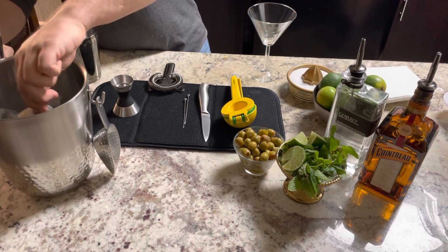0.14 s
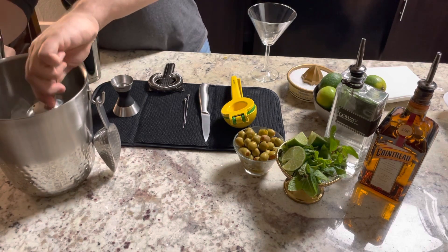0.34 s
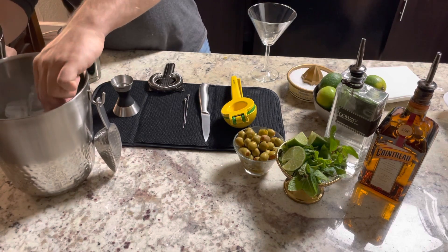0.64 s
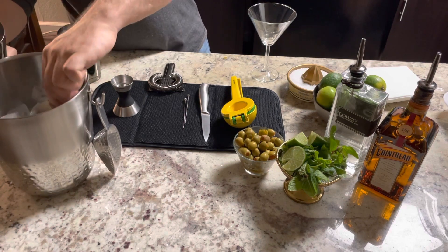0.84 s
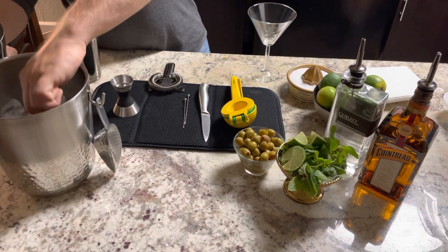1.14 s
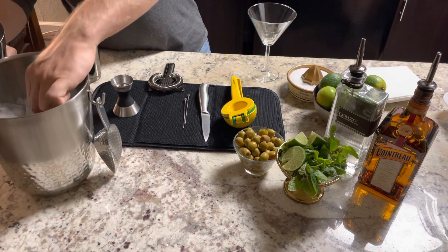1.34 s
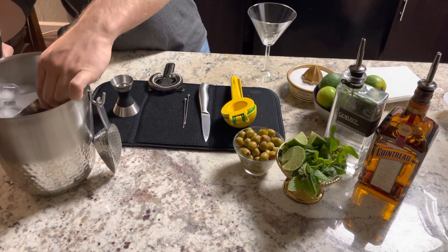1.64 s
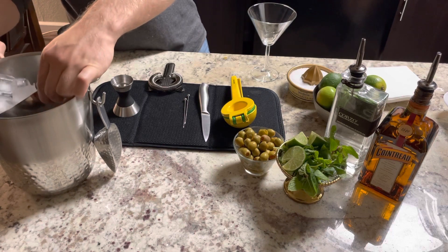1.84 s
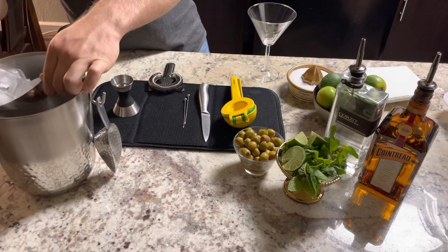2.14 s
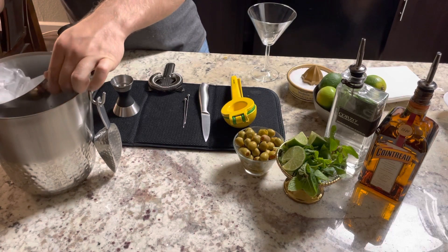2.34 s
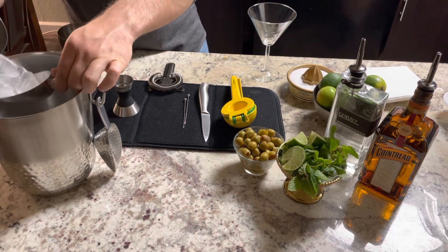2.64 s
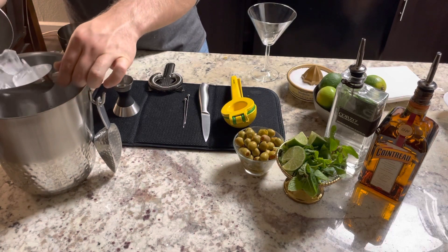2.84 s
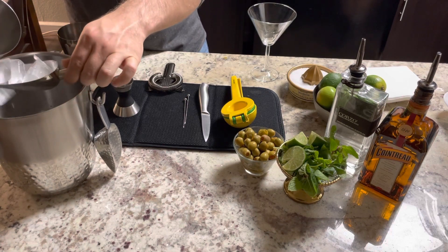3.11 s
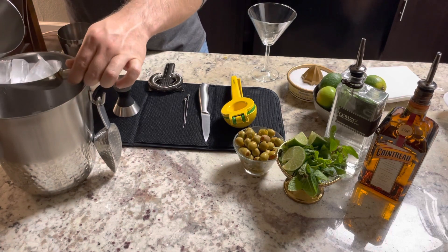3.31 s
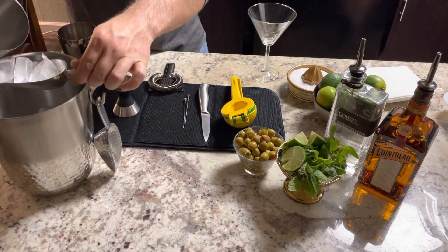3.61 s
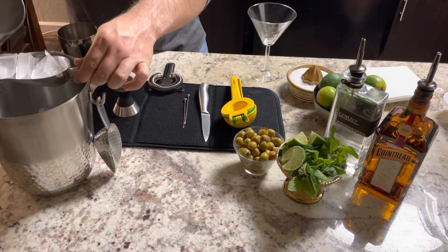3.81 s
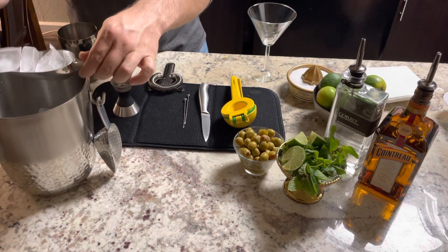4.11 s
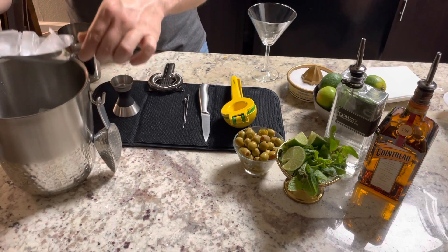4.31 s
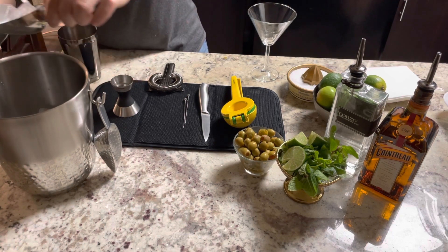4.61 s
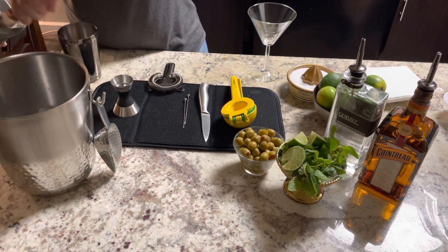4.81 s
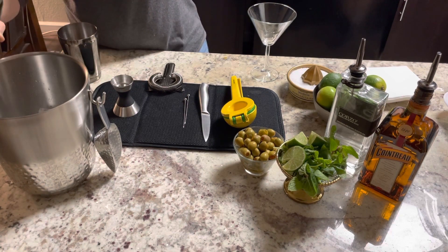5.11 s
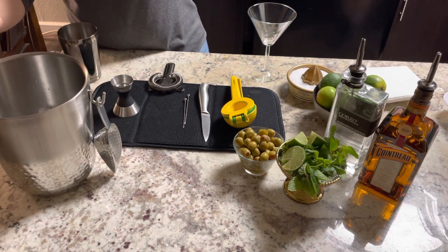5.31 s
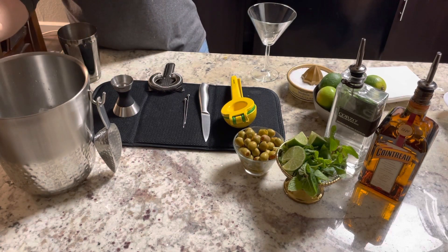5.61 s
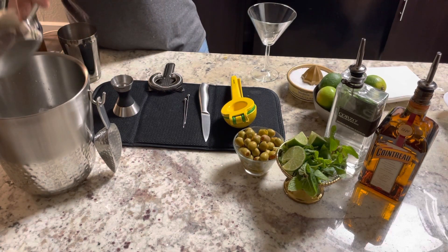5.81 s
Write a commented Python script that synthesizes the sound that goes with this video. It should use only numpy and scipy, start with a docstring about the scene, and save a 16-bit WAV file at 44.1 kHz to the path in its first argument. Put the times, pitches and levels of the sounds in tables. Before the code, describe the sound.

Ice is scooped from a steel bucket: busy glassy clatter, grinding and low metallic thuds, fading to faint ticks. Two brisk shakes of the loaded scoop follow, then near silence over soft room hum. A faint squeak precedes cubes dropping into a metal shaker with two strong, close knocks, a hollow note and thin high ringing. Small late ticks end it. Near microphone, small hard kitchen, wide stereo.

```python
"""In a kitchen, a metal scoop digs ice cubes out of a steel bucket, is shaken level, and tips a few into a steel shaker.
Each collision is a pitched knock, a clack, a brittle crack and a thud of the air in the vessel.
Between collisions the cubes grind, made of dense clicks; a faint squeak is heard as the scoop is lifted.
The steel walls and the scoop ring as fading tones, the kitchen answers with sparse echoes over a low hum,
and the recorder's stereo processing spreads it all over a left and a right channel."""
import sys
import numpy as np
from scipy import signal
from scipy.fft import rfft, irfft
from scipy.io import wavfile
from scipy.ndimage import uniform_filter1d

SR = 44100
rng = np.random.default_rng(int(sys.argv[2]) if len(sys.argv) > 2 else 0)


def store_wav(level_fs):
    """Save 16-bit WAV to argv[1]."""
    pcm = np.round(np.clip(np.atleast_2d(level_fs), -1, 1) * 32767)
    wavfile.write(sys.argv[1], SR, pcm.T.astype(np.int16))


N = 262395  # length in samples

# Two-row sounds hold a common part (shared by left and right) and a spread part (opposite in left and right).


def amp(db):
    """Turns decibels into a gain."""
    return 10 ** (np.asarray(db) / 20)


def evened(x):
    """Scales a sound to an rms of 1."""
    return x / np.sqrt(np.mean(x ** 2) + 1e-20)


def read(points, hz):
    """Reads a table's value at hz, on a log-frequency axis."""
    f, value = np.transpose(points)
    return np.interp(np.log(hz + 1), np.log(f + 1), value)


def add(mix, s, sound):
    """Adds a sound into the mix at time s."""
    start = max(round(s * SR), 0)
    part = mix[..., start:][..., :sound.shape[-1]]
    part += sound[..., :part.shape[-1]]


def tone(hz, t):
    """A plain sine wave."""
    return np.sin(2 * np.pi * hz * t)


def colour(x, spectrum, size=4096):
    """Filters a sound to the given spectrum, without pre-echo and with unit filter energy."""
    log_gain = np.log(amp(read(spectrum, abs(np.fft.fftfreq(size, 1 / SR)))))
    # minimum phase: the filter's energy comes as early as it can
    response = np.exp(np.conj(signal.hilbert(log_gain)))
    taps = np.fft.ifft(response).real[:size // 2]
    taps = taps / np.linalg.norm(taps)
    return signal.oaconvolve(x, taps[None], axes=1)[:, :N]


def fade(t, t60):
    """An exponential fall of 60 dB every t60 seconds."""
    return np.exp(-np.log(1000) * t / t60)


def dying(t, t60, rise):
    """Loudness of a struck sound: a soft start, then an exponential fall."""
    return (1 - np.exp(-t / rise)) * fade(t, t60)


def with_rebounds(hits, gap_s, loss_db, spread_octaves):
    """Each struck cube bumps a neighbour a moment later: weaker, and at another pitch."""
    s, hz, knock, crack, thud = np.transpose(hits)
    delay, detune = rng.random((len(hits), 2)).T
    later_s = s + gap_s * (.5 + delay)
    other_hz = hz * 2 ** (spread_octaves * (2 * detune - 1))
    rebounds = [later_s, other_hz, knock - loss_db, crack - loss_db, thud - loss_db]
    return np.vstack([hits, np.transpose(rebounds)])


# Tone of breaking ice, for the crack and for its brighter snap. Columns: frequency_hz, relative_level_db
CRACK_SPECTRUM = [(300, -20), (1500, -1), (3000, 3.5), (4500, -0.5), (6000, 1.5), (8000, -1.5),
                  (10000, -2.5), (12000, -5.5), (14500, -6.5), (16000, -17.5)]
SNAP_SPECTRUM = [(1000, -32.5), (4000, -22.5), (5200, -9.5), (6500, -4), (8500, 6), (10500, 2),
                 (12000, -0.5), (14000, -5), (16000, -3.5)]


def collisions(hits, clack_colour, thud_colour, knock_db, clack_db, crack_db, snap_db, thud_db,
               knock_t60, clack_t60, crack_t60, snap_t60, thud_t60):
    """Each hit: a short pitched knock, and bursts of noise as the faces meet and chip."""
    t = np.arange(SR // 6) / SR
    knocks, clacks, cracks, snaps, thuds = np.zeros((5, 2, N))
    for s, hz, knock, crack, thud, *_ in hits:
        chatter = rng.standard_normal((4, 2, len(t)))
        add(knocks[0], s, amp(knock + knock_db) * dying(t, knock_t60, 0.00086) * tone(hz, t))
        add(clacks, s, amp(knock + clack_db) * dying(t, clack_t60, 0.00089) * chatter[0])
        add(cracks, s, amp(crack + crack_db) * dying(t, crack_t60, .0012) * chatter[1])
        add(thuds, s, amp(thud + thud_db) * dying(t, thud_t60, 0.0031) * chatter[2])
        # the more the crack outweighs the knock, the more ice breaks, with a brighter snap
        brittle = 1 / (1 + amp(2 * (knock - crack)))
        add(snaps, s, brittle * amp(crack + snap_db) * dying(t, snap_t60, .0007) * chatter[3])
    out = knocks + colour(clacks, clack_colour) + colour(cracks, CRACK_SPECTRUM)
    return out + colour(snaps, SNAP_SPECTRUM) + colour(thuds, thud_colour)


def chips(per_s, spread_db):
    """Dense random clicks of uneven size, as common and spread parts."""
    size = amp(spread_db * np.minimum(rng.exponential(1, N), 4))
    happens = rng.random(N) < per_s / SR
    return evened(size * happens * rng.standard_normal((2, N)))


def jostle(per_s, t60, spread_db, centre_hz, spread_octaves, count=32):
    """A dense crunch of small knocks; the cubes are of like size, so their pitches crowd round one centre."""
    t, out = np.arange(SR // 20) / SR, np.zeros((2, N))
    clicks, cube = chips(per_s, spread_db), rng.integers(0, count, N)
    octaves = spread_octaves * np.arctanh(np.linspace(-.95, .95, count))
    for k, hz in enumerate(centre_hz * 2 ** octaves):
        knock = dying(t, t60, 0.00067) * tone(hz, t)
        out += signal.oaconvolve(clicks * (cube == k), knock[None], axes=1)[:, :N]
    return evened(out)


def stroke(t, length, sag):
    """A push starts the cubes at once; the level sags steadily (or swells if negative), then they come to rest."""
    attack_s, release_t60 = 0.0014, 0.076
    held_db = -sag * np.minimum(t, length) - 60 * np.maximum(t - length, 0) / release_t60
    return np.clip(t / attack_s, 0, 1) * amp(held_db)


def grinding(strokes, clack_colour, thud_colour, small_knocks, knocks_db, clack_db, crack_db, thud_db, uneven_db):
    """Sliding cubes stick and slip: small knocks and a fine crunch follow the stroke."""
    t, power = np.arange(SR) / SR, np.zeros((3, N))
    for s, length, level, sag, crispness, weight in strokes:
        levels_db = [[level], [level + crispness], [level + weight]]
        add(power, s, (amp(levels_db) * stroke(t, length, sag)) ** 2)
    grind, crisp, push = np.sqrt(power)
    # many contacts slip at once, in clumps of a few milliseconds
    smooth_noise = uniform_filter1d(rng.standard_normal(N), size=260)
    clumps = evened(uniform_filter1d(smooth_noise, size=130))
    slips = evened(chips(per_s=2500, spread_db=-0.5) * amp(uneven_db * clumps))
    out = amp(knocks_db) * grind * small_knocks
    out += amp(clack_db) * colour(grind * slips, clack_colour)
    out += amp(crack_db) * colour(crisp * slips, CRACK_SPECTRUM)
    return out + amp(thud_db) * colour(push * slips, thud_colour)


def ring(x, modes):
    """The sound inside a vessel sets its wall resonances humming along."""
    out = np.zeros_like(x)
    for hz, width, db in modes:
        r = np.exp(-np.pi * width / SR)
        turn = np.exp(2j * np.pi * hz / SR)
        out += 2 * amp(db) * signal.lfilter([1 - r], [1, -r * turn], x).real
    return out


# The air in the bucket rings lower the deeper the scoop is in. Columns: time_s, pitch_hz
BUCKET_AIR_PITCH = [(0, 480), (.5, 450), (.8, 425), (1.2, 428), (1.55, 412), (1.85, 435), (2.9, 418),
                    (3.25, 420), (3.4, 470)]


def bucket_air(x, width_hz, db):
    """The resonance of the air in the bucket, which moves with the scoop."""
    hz = np.interp(np.arange(N) / SR, *np.transpose(BUCKET_AIR_PITCH))
    turn, r = np.exp(2j * np.pi * np.cumsum(hz) / SR), np.exp(-np.pi * width_hz / SR)
    # shift the moving pitch down to zero, smooth there, and shift back
    smoothed = signal.lfilter([1 - r], [1, -r], x / turn)
    return 2 * amp(db) * (turn * smoothed).real


def tinkles(hits, db, t60, count=16):
    """Each hit cube rings briefly at many random high pitches, as loudly as it cracks."""
    t, out = np.arange(SR // 6) / SR, np.zeros((2, N))
    for s, _, _, crack, *_ in hits:
        hz = rng.uniform(4600, 12500, (count, 1))
        tones = rng.choice([-1, 1], (2, count)) @ tone(hz, t) / np.sqrt(count)
        add(out, s, amp(crack + db) * dying(t, t60, 0.00045) * tones)
    return out


def booms(hits, db):
    """Each blow on the bucket's wall gives a short low note; a random pitch stands for where it lands."""
    t, out = np.arange(SR // 8) / SR, np.zeros((2, N))
    pitches_hz = rng.uniform(380, 490, len(hits))
    for (s, *_, thud), hz in zip(hits, pitches_hz):
        add(out[0], s, amp(thud + db) * dying(t, .06, 0.0025) * tone(hz, t))
    return out


def clinks(hits, modes, crack_db, knock_db, reach_hz):
    """Each blow rings the steel wall, its knock most near its own pitch; random gains stand for where it lands."""
    t, out = np.arange(SR) / SR, np.zeros((2, N))
    hz, width, db = np.transpose(modes)[:, :, None]
    tones = amp(db) * np.exp(-np.pi * width * t) * tone(hz, t)
    places = rng.uniform(-1, 1, (len(hits), 2, len(modes)))
    for (s, pitch, knock, crack, *_), place in zip(hits, places):
        nearness = 1 / (1 + ((hz.T - pitch) / reach_hz) ** 2)
        drive = amp(crack + crack_db) + amp(knock + knock_db) * nearness
        add(out, s, (place * drive) @ tones)
    return out


# Scoop and cubes colliding in the bucket; the levels are relative.
# Columns: start_s, knock_pitch_hz, knock_level_db, crack_level_db, thud_level_db
BUCKET_HITS = [ (0.012, 2130, -14, -33.5, -22), (0.021, 880, -13, -20, -26),
               (0.054, 2240, -15.5, -22.5, -29), (0.074, 1860, -21, -25.5, -17),
               (0.123, 2400, -30.5, -30.5, -35.5), (0.157, 2340, -28, -32, -56),
               (0.171, 1833, -18.5, -26, -35.5), (0.24, 2190, -27, -44, -51.5),
               (0.327, 2080, -24.5, -27, -46.5), (0.423, 1980, -27, -26.5, -23),
               (0.451, 2280, -25.5, -28.5, -38.5), (0.472, 1094, -18.5, -20.5, -26.5),
               (0.483, 917, -15, -25, -17), (0.498, 2150, -16, -27, -36.5),
               (0.521, 2420, -24, -24.5, -31.5), (0.537, 1500, -25.5, -32.5, -34),
               (0.567, 2130, -30, -30.5, -33.5), (0.599, 2240, -21.5, -27, -35),
               (0.635, 2120, -24, -29, -48.5), (0.659, 2740, -26.5, -30.5, -51.5),
               (0.718, 2160, -35.5, -35, -48.5), (0.75, 2240, -32, -32, -32),
               (0.772, 2090, -19.5, -21, -44), (0.805, 2300, -23.5, -29, -25),
               (0.868, 2250, -31, -32.5, -49), (0.901, 2130, -21.5, -34, -33.5),
               (1.003, 2270, -41.5, -32, -48), (1.02, 2030, -25, -38, -49), (1.032, 2330, -23, -29, -45),
               (1.05, 1970, -26.5, -24.5, -31), (1.058, 2120, -15.5, -19, -29.5),
               (1.078, 2450, -26, -33.5, -25), (1.098, 2280, -23.5, -30.5, -28),
               (1.173, 1100, -31.5, -30.5, -22), (1.19, 2400, -22.5, -33, -40),
               (1.238, 2300, -29, -33, -41.5), (1.202, 2350, -26, -25.5, -42.5),
               (1.278, 2220, -28, -31.5, -43), (1.331, 1500, -29.5, -39.5, -27.5),
               (1.359, 1720, -34.5, -32, -21.5), (1.383, 1750, -30.5, -34.5, -38.5),
               (1.416, 1504, -32.5, -28.5, -30.5), (1.448, 2260, -26, -18.5, -22.5),
               (1.481, 2270, -19, -24.5, -33), (1.526, 2100, -29, -35, -28), (1.542, 2080, -20, -28.5, -36),
               (1.583, 1765, -19, -24.5, -39), (1.596, 1765, -17, -21, -20.5),
               (1.643, 1765, -26, -29, -41.5), (1.656, 1960, -32, -32.5, -31),
               (1.67, 950, -38.5, -21, -30.5), (1.763, 1160, -26.5, -45.5, -25),
               (1.78, 1500, -17.5, -36.5, -23), (1.805, 1080, -25, -27.5, -24),
               (1.842, 2117, -21, -31, -30), (1.858, 1193, -28.5, -46, -43.5), (1.91, 1030, -35, -40, -57),
               (2.125, 1460, -38, -52, -51), (2.141, 1250, -46.5, -67, -57.5), (2.199, 1200, -46, -52, -50),
               (2.224, 1930, -41.5, -53, -48.5), (2.308, 1730, -46, -60, -60),
               (2.346, 1960, -49.5, -69, -60), (2.415, 1905, -53.5, -59.5, -61.5),
               (2.437, 1140, -49, -68, -55.5), (2.476, 1880, -48.5, -65, -59.5),
               (2.501, 2010, -52, -64, -63.5), (2.592, 1720, -49.5, -67, -57),
               (2.652, 2304, -48, -46.5, -46), (2.664, 1950, -48.5, -55, -44),
               (2.696, 2150, -57, -57, -56.5), (2.716, 2044, -36.5, -43.5, -50),
               (2.724, 1595, -35.5, -46, -45.5), (2.771, 2080, -39.5, -48, -49.5),
               (2.789, 1980, -42, -49.5, -51.5), (2.846, 1530, -24.5, -24, -28.5),
               (2.862, 2320, -28.5, -32, -36), (2.89, 2250, -33.5, -37.5, -37),
               (2.905, 1080, -32.5, -40, -40.5), (2.923, 2390, -38, -20, -32.5),
               (2.938, 2340, -18.5, -33.5, -33), (2.953, 1750, -32, -33.5, -39.5),
               (2.969, 2220, -26.5, -28.5, -40.5), (2.999, 2305, -32.5, -39, -43.5),
               (3.052, 2350, -35.5, -32, -37.5), (3.07, 1940, -30, -33.5, -41.5),
               (3.096, 2350, -36.5, -40, -44), (3.189, 1740, -31.5, -34.5, -28),
               (3.198, 1744, -12, -23, -28), (3.203, 2384, -21, -35.5, -39.5),
               (3.211, 1617, -18, -23.5, -27.5), (3.222, 1190, -23, -29.5, -34),
               (3.254, 1180, -31, -34, -37), (3.279, 1770, -32.5, -41, -44), (3.302, 2370, -36, -31, -39.5),
               (3.313, 2320, -27, -39.5, -42.5), (3.327, 1765, -26, -36.5, -35),
               (3.371, 2240, -28.5, -35, -36), (3.447, 1560, -35.5, -49, -39.5),
               (3.506, 1202, -34.5, -47.5, -35.5), (3.55, 2186, -36.5, -43.5, -41)]
# Cubes sliding over each other in the bucket, one row a stroke; the last two are relative to the grinding.
# Columns: start_s, length_s, grinding_level_db, sag_db_per_s, crispness_db, push_on_vessel_db
BUCKET_STROKES = [ (0.0, 0.086, -21.5, 20.5, -3.5, 0), (0.1, 0.061, -31.5, 30, -2.5, -15),
                  (0.21, 0.29, -33.5, -12, -6.5, -1), (0.425, .12, -26, -14.5, -7.5, -9),
                  (0.55, 0.35, -31.5, 48.5, -1.5, 1), (0.775, 0.47, -34.5, -8.5, -5, -3),
                  (1.05, 0.2, -26.5, 12.5, -3, -6.5), (1.25, 0.19, -29.5, 23, -6, -4),
                  (1.485, 0.2, -25.5, 27.5, -4, -2.5), (1.7, 0.17, -34, 19.5, -5, -9),
                  (1.855, 0.284, -43, 88.5, -7, -17.5), (2.125, 0.46, -57.5, 8, -9.5, 1),
                  (2.59, .055, -61.5, -70.5, -3, 10), (2.655, 0.27, -48, 48.5, -6.5, -2),
                  (2.855, 0.042, -27.5, 191, -2.5, 3), (2.935, 0.24, -29.5, 92, -0.5, -3),
                  (3.205, 0.053, -29, 120.5, -0.5, 0), (3.25, 0.23, -34.5, 70.5, -2, -4),
                  (3.506, .13, -39.5, 155, -8, -7.5)]
# Resonances of the bucket's steel wall. Columns: pitch_hz, width_hz, relative_level_db
BUCKET_MODES = [(932, 24, -3), (985, 24, -4), (1150, 30, -1), (1185, 34, 2), (1522, 30, 3), (1745, 34, 2),
                (1765, 22, 2), (2075, 18, -2), (2186, 2.7, -14), (2262, 26, 0), (2325, 30, 0),
                (2385, 26, 2), (2520, 14, -7), (2815, 28, -2), (3460, 40, 0), (4160, 70, -4), (5085, 50, 2),
                (5295, 40, 1), (6500, 45, -2)]
# Tone of contacts, and of thuds of the air, in the bucket. Columns: frequency_hz, relative_level_db
BUCKET_CLACK = [(300, -21.5), (650, -19.5), (1000, 6), (1500, 0), (2250, 1.5), (2900, -2.5), (4200, -15.5),
                (8000, -23.5), (16000, -52)]
BUCKET_THUD = [(25, -32.5), (50, -15), (120, -20), (220, -15), (330, -10), (440, 0), (560, -7), (650, -6.5),
               (800, -8), (1400, -29), (5000, -56.5)]


def ice_in_bucket(small_knocks):
    """Cubes knock and grind while the bucket's air and steel wall answer."""
    hits = with_rebounds(BUCKET_HITS, gap_s=0.019, loss_db=12, spread_octaves=0.31)
    bucket = collisions(hits, BUCKET_CLACK, BUCKET_THUD,
                        knock_db=3.5, clack_db=-3.0, crack_db=-0.5, snap_db=6.5, thud_db=5.5,
                        knock_t60=0.033, clack_t60=0.051, crack_t60=.11, snap_t60=0.092, thud_t60=0.029)
    bucket += grinding(BUCKET_STROKES, BUCKET_CLACK, BUCKET_THUD, small_knocks,
                       knocks_db=-8.5, clack_db=-8, crack_db=2.0, thud_db=-6.5, uneven_db=0.5)
    wall = amp(-7.5) * ring(bucket, BUCKET_MODES)
    air = bucket_air(bucket, width_hz=49, db=-2.0)
    bucket += wall + air + tinkles(BUCKET_HITS, db=-5, t60=.045)
    bucket += booms(BUCKET_HITS, db=1.5)
    return bucket + clinks(BUCKET_HITS, BUCKET_MODES, crack_db=-14, knock_db=-10.5, reach_hz=200)


# How long echoes last in the kitchen. Columns: frequency_hz, time_to_fall_60_db_s
KITCHEN_T60 = [(150, 0.96), (500, 0.57), (1700, 0.38), (4600, 0.51), (9000, 0.18), (15000, 0.47)]


def kitchen(x, onset):
    """Sparse reflections from counter and cupboards, each band dying at its own speed."""
    taps = rng.standard_normal((2, SR)) * (rng.random((2, SR)) < 5000 / SR)
    hz, t, z = signal.stft(taps, SR, nperseg=256)
    fading = fade(t, read(KITCHEN_T60, hz)[:, None])
    tail = signal.istft(z * fading, SR, nperseg=256)[1]
    tail *= 1 - np.exp(-(np.arange(tail.shape[1]) / SR / onset) ** 2)
    tail = tail / np.linalg.norm(tail, axis=1, keepdims=True)
    return signal.fftconvolve(x[:1], tail, axes=1)[:, :N]


# Tone of the room's hum. Columns: frequency_hz, relative_level_db
HUM_SPECTRUM = [(20, -45), (30, -29), (45, -3), (70, -1.5), (110, -4), (180, -4.5), (250, 1.5), (330, -2),
                (480, -5), (800, -12), (1100, -24), (2200, -34.5), (3400, -40.5), (4200, -43.5),
                (8000, -45.5), (16000, -48.5)]


def room_hum(db):
    """A steady low hum: random noise filtered to the room's spectrum."""
    return amp(db) * colour(rng.standard_normal((2, N)), HUM_SPECTRUM)


# A faint squeak while the scoop is lifted, rough at first, then clear, fraying as it sinks.
# Columns: time_s, pitch_hz, relative_level_db, waver_hz
SQUEAK = [(4.29, 2250, -88, 90), (4.34, 2310, -73, 130), (4.42, 2400, -71, 130), (4.48, 2485, -68, 50),
          (4.53, 2510, -69, 50), (4.58, 2470, -75, 110), (4.63, 2380, -81, 150)]


def squeak(db):
    """A thin tone with a randomly wavering pitch, which steadies as it glides up and sinks as it fades."""
    s, *columns = np.transpose(SQUEAK)
    t, out = np.arange(s[0], s[-1], 1 / SR), np.zeros((2, N))
    hz, level, waver_hz = (np.interp(t, s, column) for column in columns)
    waver = evened(uniform_filter1d(rng.standard_normal(len(t)), size=120))
    phase = 2 * np.pi * np.cumsum(hz + waver_hz * waver) / SR
    add(out[0], s[0], amp(db + level) * np.sin(phase))
    return out


# Cubes landing and settling in the shaker; all but the hollow tone's level are relative. Columns:
# start_s, knock_pitch_hz, knock_level_db, crack_level_db, thud_level_db, hollow_tone_level_db
SHAKER_HITS = [(4.656, 2740, -49, -35.5, -31.5, -40.5), (4.689, 3170, -39, -41, -63, -60),
               (4.755, 3060, -34.5, -30.5, -39, -60), (4.777, 2040, -34, -31.5, -36, -49),
               (4.8405, 1440, -3, -29, -26, -40), (4.8582, 1464, -2, -27, -29.5, -31),
               (4.893, 1440, -27, -33, -58, -33), (4.898, 1360, -15, -30.5, -48, -47),
               (5.008, 1790, -32, -38, -40.5, -36.5), (5.081, 2250, -23, -26, -39, -52),
               (5.096, 3070, -19, -30, -55, -38), (5.152, 1645, -30, -46, -50, -40.5),
               (5.181, 1770, -31, -46, -50, -59), (5.208, 1510, -38, -38, -57.5, -68),
               (5.372, 1470, -38.5, -68, -51, -50.5), (5.471, 1520, -40.5, -75, -55.5, -73.5),
               (5.772, 1462, -40.5, -53, -60.5, -68), (5.844, 3130, -40, -48.5, -45, -59),
               (5.889, 2000, -40, -48, -55, -51)]
# Cubes sliding over each other in the shaker, one row a stroke; the last two are relative to the grinding.
# Columns: start_s, length_s, grinding_level_db, sag_db_per_s, crispness_db, push_on_vessel_db
SHAKER_STROKES = [ (4.59, 0.13, -62.5, 24, 5.5, -16), (4.66, 0.13, -42.5, 69, 16, 0),
                  (4.775, 0.055, -35, 84, 12.5, -6.5), (4.87, 0.36, -29.5, 55, 2, -13),
                  (5.081, 0.11, -21, 248, -22, -8.5), (5.165, 0.16, -31, 160, 3, -8),
                  (5.25, 0.33, -51, 39, -9, -11.5), (5.68, 0.22, -61, -39, -9.5, -1),
                  (5.772, 0.022, -38.5, 294, -25, -14), (5.844, 0.11, -36.5, 174, -27, -20)]
# Resonances of the shaker's steel wall. Columns: pitch_hz, width_hz, relative_level_db
SHAKER_MODES = [(1163, 10, -4), (1217, 5, 0), (1368, 9, 2), (1420, 16, 0), (1475, 16, -2), (1543, 6, -1),
                (1600, 7, -3), (1720, 10, -2), (1853, 10, -1), (2065, 10, 1), (2210, 9, 0), (2374, 8, -4),
                (2562, 7, -4), (2805, 12, 2), (3005, 7, -4), (3085, 11, -2), (3135, 11, -1), (3572, 12, -2),
                (6730, 20, -7), (6930, 20, -7)]
# Tone of contacts, and of thuds of the air, in the shaker. Columns: frequency_hz, relative_level_db
SHAKER_CLACK = [(300, -51.5), (800, -18), (1100, 4.5), (1400, 6), (1750, 6), (2070, 1.5), (2550, -6),
                (2900, 3), (3250, -6), (3550, 0.5), (4000, -11.5), (8000, -18), (16000, -56.5)]
SHAKER_THUD = [(25, -49.5), (60, -38.5), (150, -29.5), (330, -11), (470, -4), (550, -1.5), (680, -12.5),
               (850, -10.5), (1400, -23.5), (5000, -75.5)]


def ice_in_shaker(small_knocks):
    """Cubes land, settle and grind while the shaker's steel wall rings."""
    shaker = collisions(SHAKER_HITS, SHAKER_CLACK, SHAKER_THUD,
                        knock_db=1.5, clack_db=-13.5, crack_db=-3.5, snap_db=9, thud_db=8.5,
                        knock_t60=0.028, clack_t60=0.06, crack_t60=0.14, snap_t60=0.028, thud_t60=0.032)
    shaker += grinding(SHAKER_STROKES, SHAKER_CLACK, SHAKER_THUD, small_knocks,
                       knocks_db=-20.5, clack_db=-9.5, crack_db=-13.5, thud_db=-5.5, uneven_db=3.0)
    shaker += amp(-13.5) * ring(shaker, SHAKER_MODES) + tinkles(SHAKER_HITS, db=-0.5, t60=.045)
    return shaker + clinks(SHAKER_HITS, SHAKER_MODES, crack_db=-9.5, knock_db=-25, reach_hz=300)


# The shaker's air column: its pitch dips, then rises as the scoop uncovers the mouth. Columns: time_s, pitch_hz
HOLLOW_PITCH = [(4.66, 530), (4.8, 505), (4.87, 545), (4.92, 562), (5.2, 560)]


def hollow(hits):
    """Every landing cube tops up the ring of the air column in the shaker."""
    t, power = np.arange(SR) / SR, np.zeros(N)
    for s, *_, db in hits:
        add(power, s, (amp(db) * dying(t, .32, 0.0048)) ** 2)
    hz = np.interp(np.arange(N) / SR, *np.transpose(HOLLOW_PITCH))
    note = np.sqrt(power) * np.sin(2 * np.pi * np.cumsum(hz) / SR)
    return np.array([note, np.zeros(N)])


# Cubes knock the scoop as they leave it. Columns: start_s, relative_level_db
SCOOP_BLOWS = [(4.755, -10.5), (4.856, -2), (5.081, 2.5)]
# The emptied scoop's ringing tones. Columns: pitch_hz, relative_level_db, time_to_fall_60_db_s
SCOOP_MODES = [(5050, -49, .95), (5062, -48, .5), (5110, -25, .04), (5631, -60, .6), (5835, -47, .15),
               (6196, -55, .55), (7200, -48, .62), (7262, -38, .12), (9329, -57, .35), (9862, -58, .3)]


def scoop():
    """The emptying scoop's faint, high ring beats and fades until it is put down."""
    put_down_s, damped_t60 = 5.58, .12
    t, out = np.arange(SR) / SR, np.zeros((2, N))
    for s, blow_db in SCOOP_BLOWS:
        for hz, db, t60 in SCOOP_MODES:
            add(out[0], s, amp(blow_db + db) * dying(t, t60, 0.00118) * tone(hz, t))
    since_put_down = np.maximum(np.arange(N) / SR - put_down_s, 0)
    return out * fade(since_put_down, damped_t60)


# How alike the left and right channels are. Columns: frequency_hz, likeness (no unit, 1 is fully alike)
LIKENESS = [(60, .95), (125, .85), (400, .88), (800, .55), (1300, .65), (2300, .8), (3300, .3), (7000, .35),
            (7900, .97), (8700, .97), (9900, .72), (10500, .98), (11200, .98), (12200, .6), (12700, .99),
            (13500, .99), (14200, .7), (15300, .98)]
# How far the left channel's phase leads the right's. Columns: frequency_hz, lead_radians
LEAD = [(200, 0), (900, 1.2), (1600, 1.1), (2600, .3), (3800, .7), (5000, -1), (5900, -2.5), (6700, -.9),
        (7300, -1.4), (7800, -3.1), (8600, -3), (10400, 0), (11400, .1), (12600, 3), (13600, 3.2),
        (15100, 6.28)]
# How much louder the left channel is than the right. Columns: frequency_hz, left_minus_right_db
TILT = [(60, 0.5), (110, -2), (200, 2), (380, 0.5), (650, 0.5), (1290, 2), (2380, -2), (4400, -4.5),
        (8120, 0.5), (15000, 0)]


def stereo_processing(x):
    """The recorder spreads common and spread parts over two channels, with likeness and phase set by frequency."""
    hz, (common, spread) = np.fft.rfftfreq(2 * N, 1 / SR), rfft(x, 2 * N)
    like = np.clip(read(LIKENESS, hz), -1, 1)
    common, spread = common * np.sqrt((1 + like) / 2), spread * np.sqrt((1 - like) / 2)
    # each channel takes half of the level difference and half of the lead
    lean = amp(read(TILT, hz) / 2) * np.exp(.5j * read(LEAD, hz))
    left, right = (common + spread) * lean, (common - spread) / lean
    return irfft(np.array([left, right]), 2 * N)[:, :N]


def scene():
    """Ice in the bucket, ice in the shaker, the ringing scoop, a faint squeak, the room and its hum, in stereo."""
    small_knocks = jostle(per_s=650, t60=0.024, spread_db=2.5, centre_hz=2163, spread_octaves=.3)
    bucket = ice_in_bucket(small_knocks)
    shaker = ice_in_shaker(small_knocks)
    room = kitchen(amp(-8.0) * bucket + amp(-8.5) * shaker, onset=0.0045)
    hum = room_hum(db=-57.5)
    mix = bucket + room + hum + squeak(db=-2.0) + shaker + hollow(SHAKER_HITS) + scoop()
    return stereo_processing(mix)


def record(dry):
    """The recorder's band limits: rumble below 38 Hz and treble above 15850 Hz are cut."""
    dry = signal.sosfilt(signal.butter(6, 38, "highpass", fs=SR, output="sos"), dry)
    low_pass = signal.firwin(401, 15850, window=("kaiser", 9), fs=SR)
    return signal.oaconvolve(dry, low_pass[None], "same")


dry = scene()
out = record(dry)
store_wav(out)
```